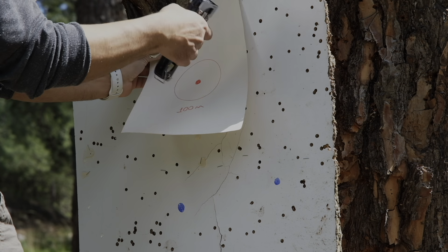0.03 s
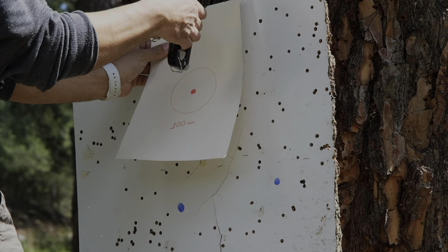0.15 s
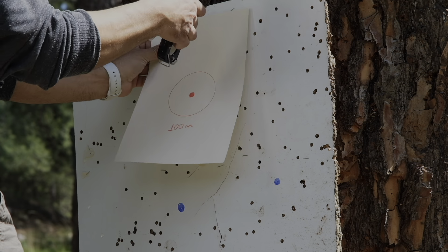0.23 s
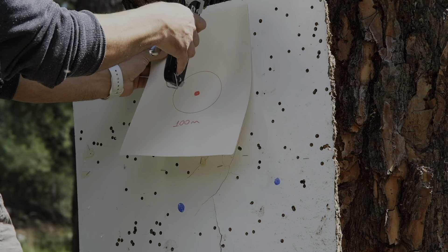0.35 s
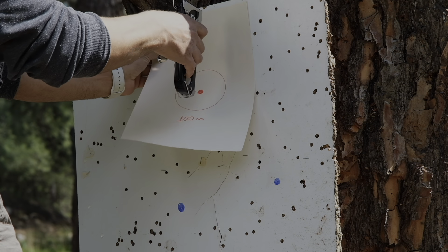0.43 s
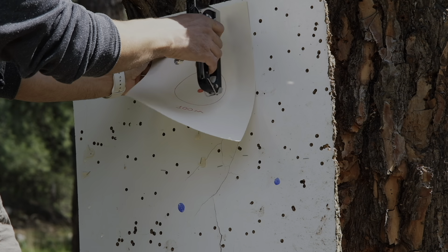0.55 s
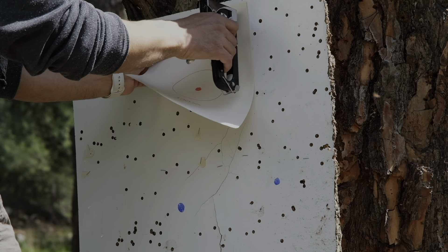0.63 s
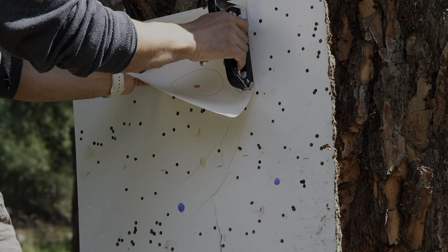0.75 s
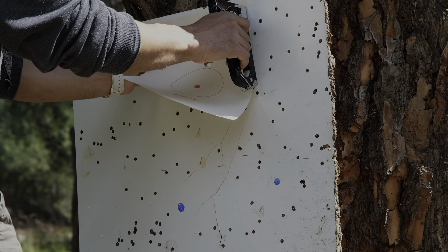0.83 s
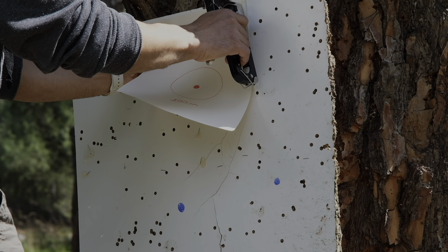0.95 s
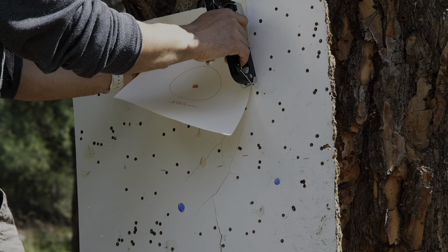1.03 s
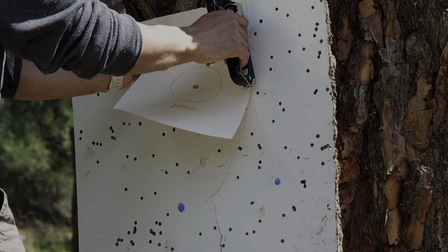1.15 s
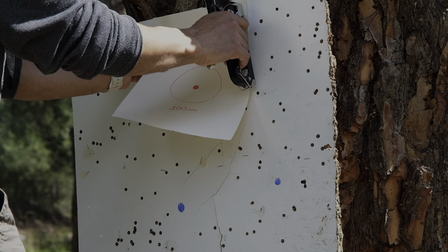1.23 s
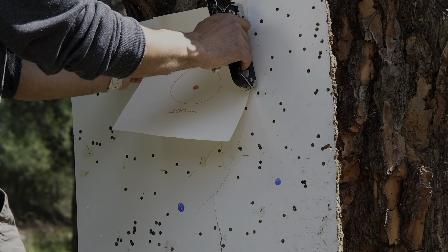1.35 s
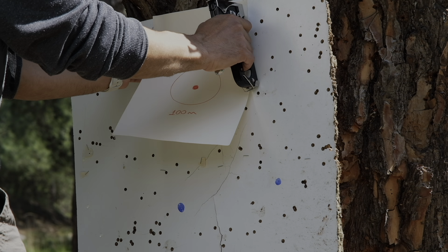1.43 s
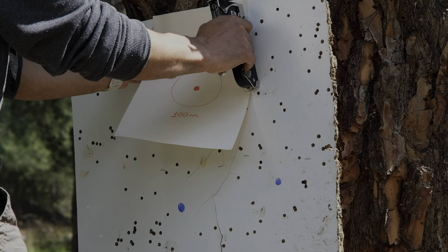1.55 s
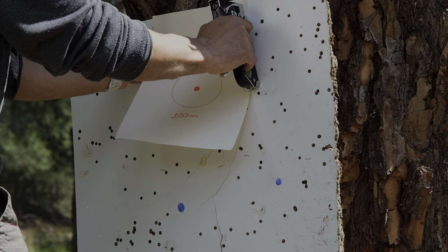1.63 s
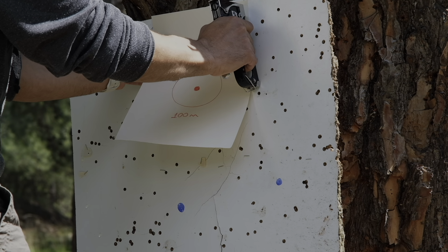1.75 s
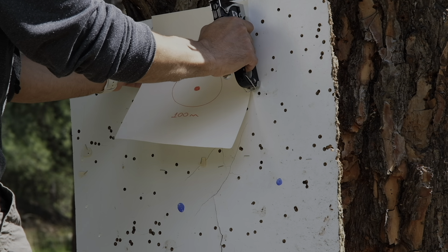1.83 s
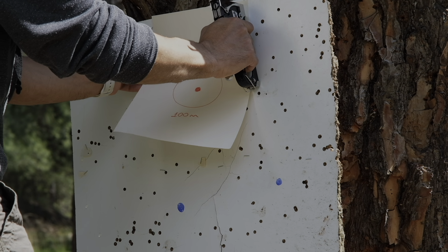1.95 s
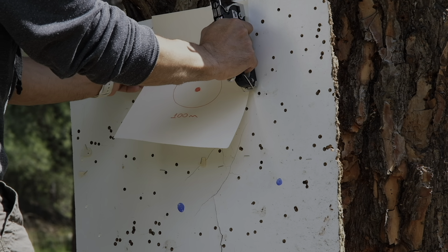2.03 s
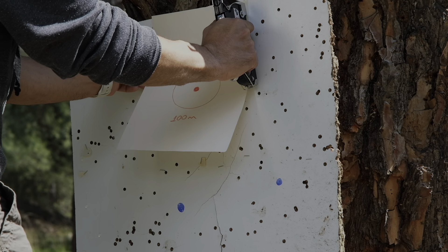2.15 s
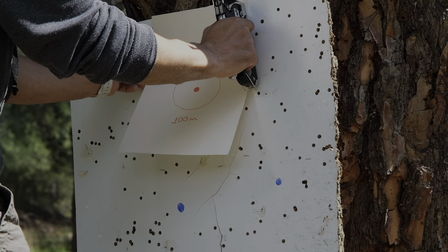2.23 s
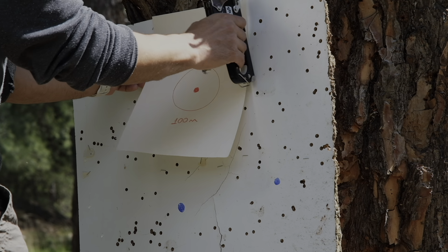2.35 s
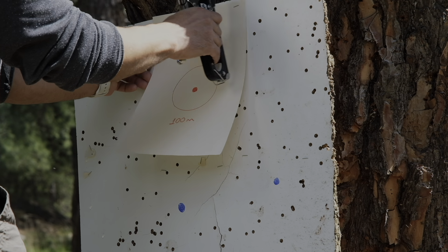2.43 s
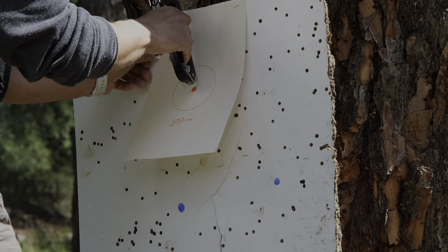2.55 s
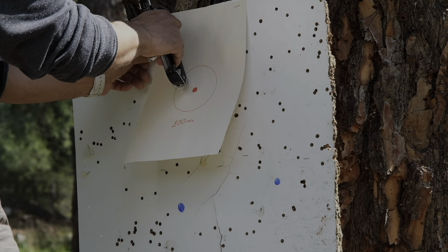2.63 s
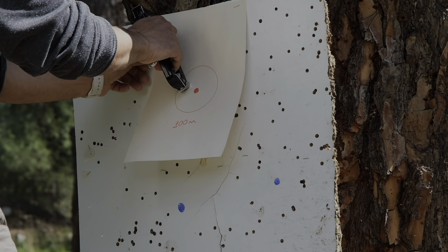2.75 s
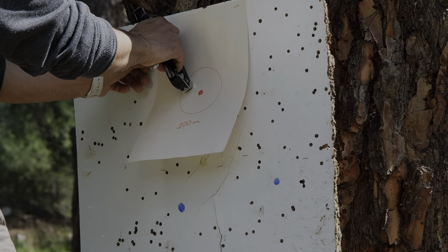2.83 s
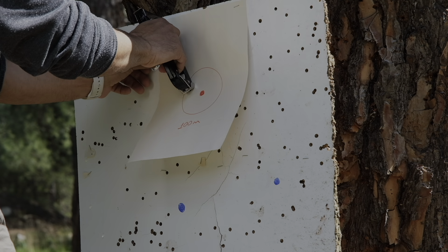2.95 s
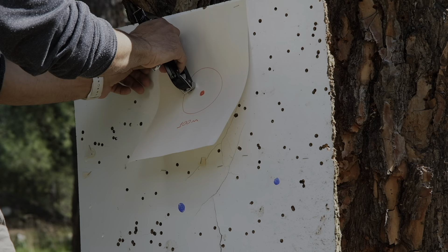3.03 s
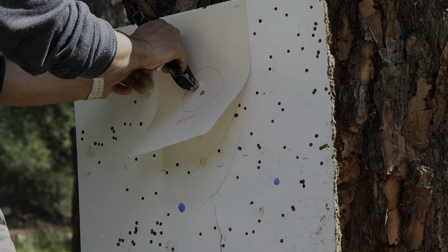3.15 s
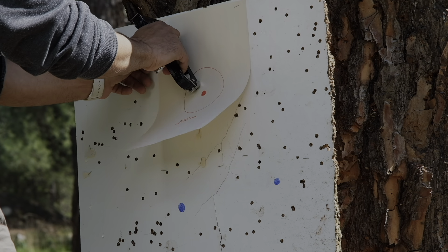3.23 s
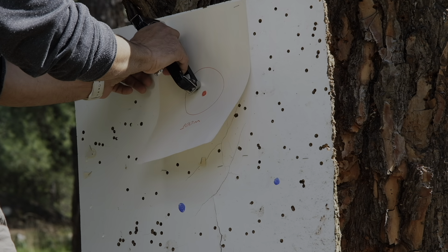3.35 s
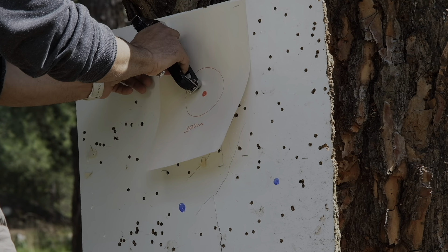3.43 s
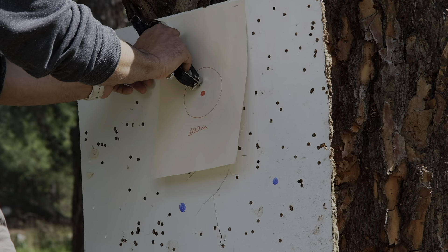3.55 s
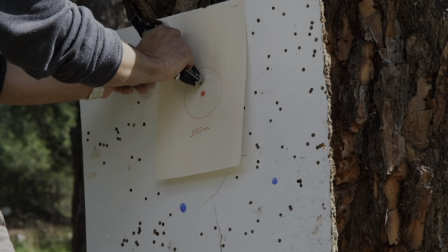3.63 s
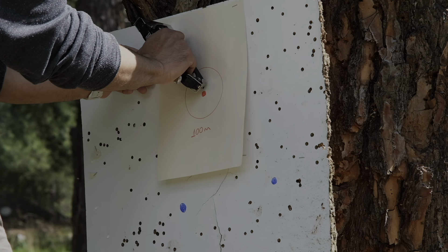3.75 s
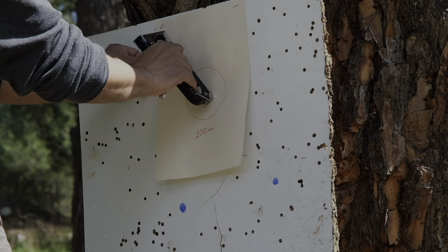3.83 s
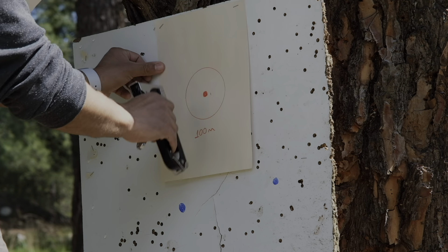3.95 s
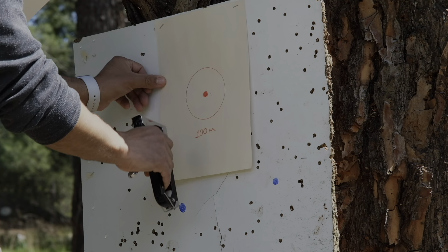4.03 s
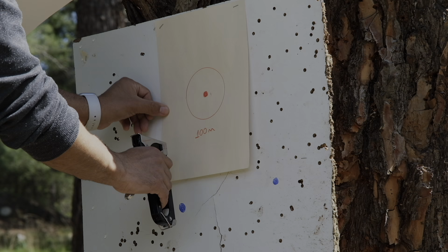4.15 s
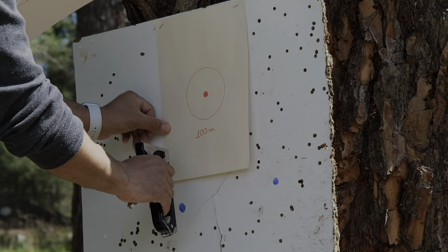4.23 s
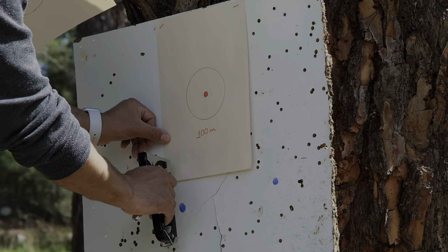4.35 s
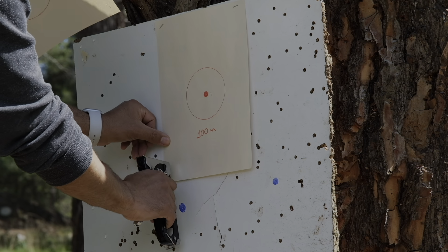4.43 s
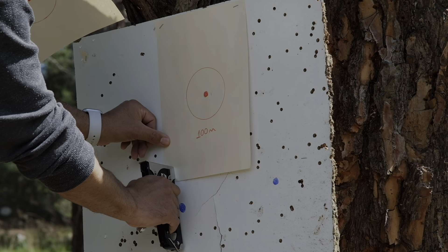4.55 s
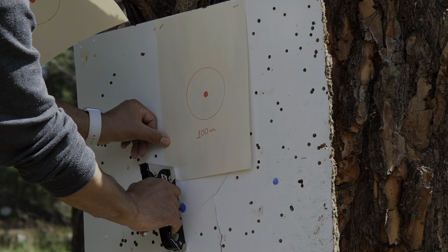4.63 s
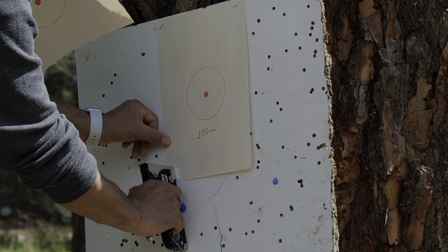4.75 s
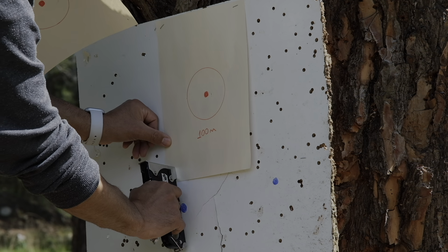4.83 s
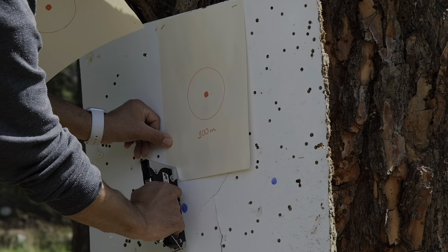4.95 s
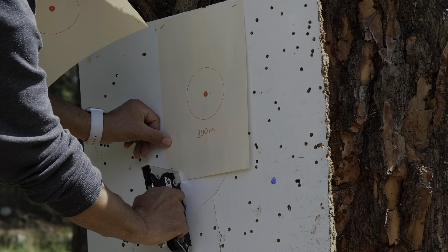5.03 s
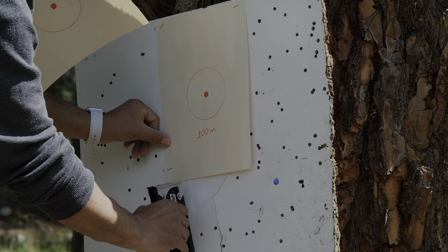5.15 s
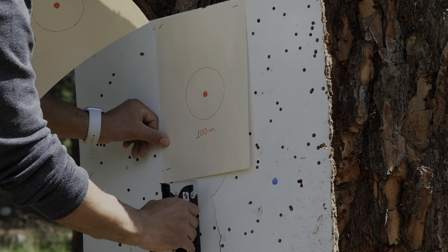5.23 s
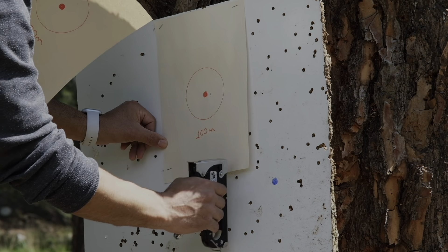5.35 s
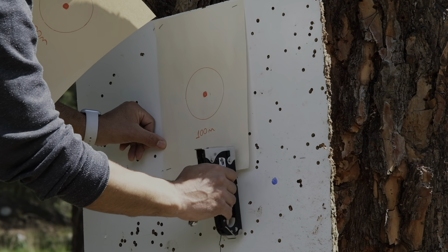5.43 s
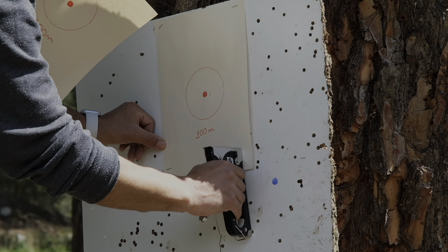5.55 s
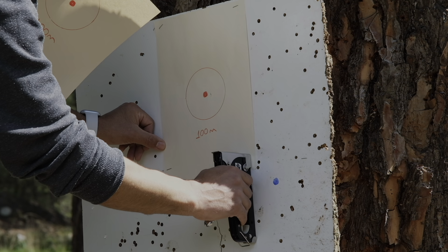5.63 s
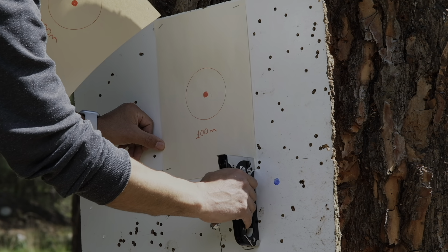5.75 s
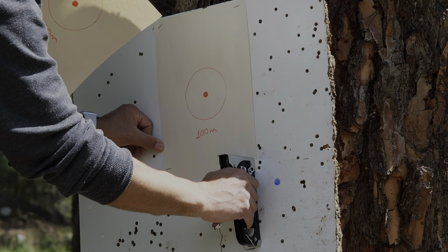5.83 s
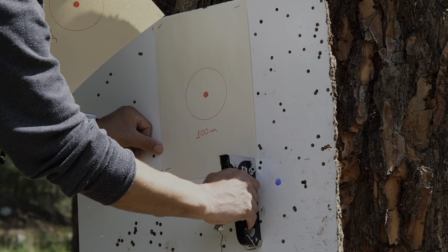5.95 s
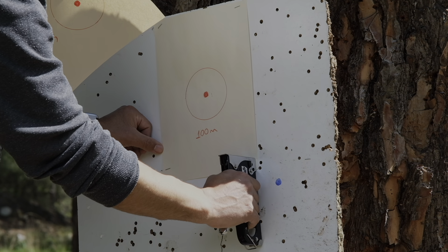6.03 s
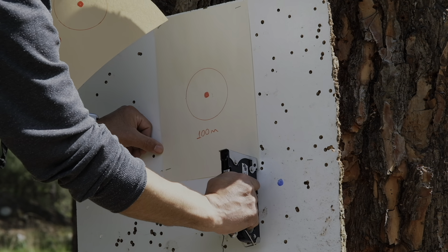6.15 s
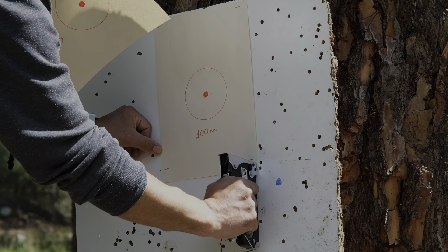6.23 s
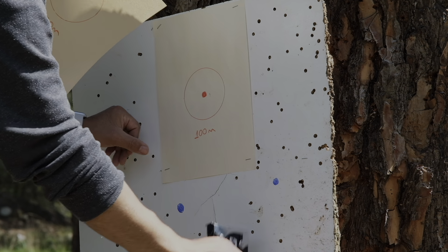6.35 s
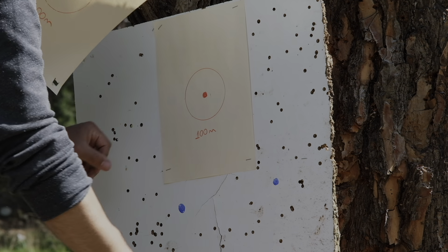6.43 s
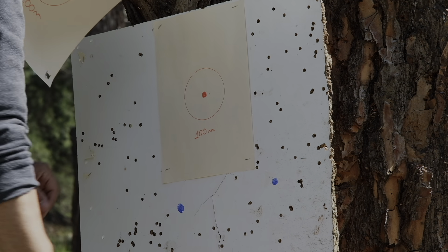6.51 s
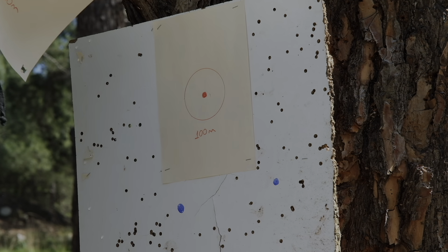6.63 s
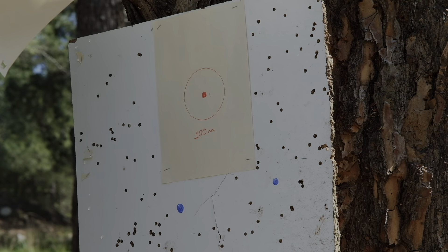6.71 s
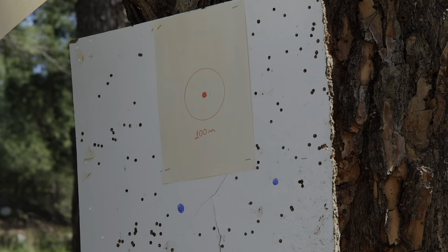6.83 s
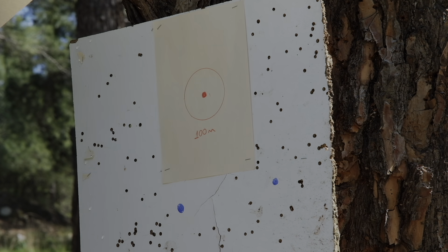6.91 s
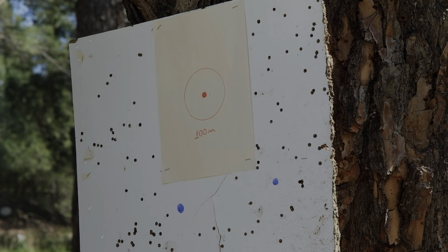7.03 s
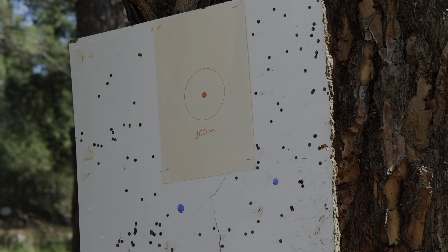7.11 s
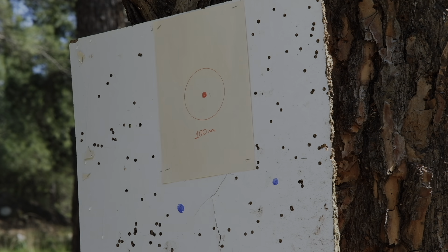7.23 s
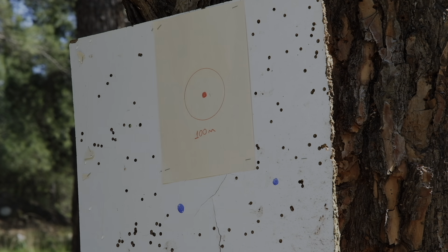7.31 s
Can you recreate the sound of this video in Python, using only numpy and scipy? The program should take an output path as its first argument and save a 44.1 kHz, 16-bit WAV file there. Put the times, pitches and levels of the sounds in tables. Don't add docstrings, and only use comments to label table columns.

```python
import sys
import numpy as np
from scipy import signal
from scipy.io import wavfile
from scipy.ndimage import uniform_filter1d

SR = 44100
rng = np.random.default_rng(int(sys.argv[2]) if len(sys.argv) > 2 else 0)


def bounce(signal):
    frames = np.transpose(np.atleast_2d(signal))
    limited = np.clip(frames, -1, 1)
    pcm = np.round(limited * 32767).astype(np.int16)
    wavfile.write(sys.argv[1], SR, pcm)


def rack_gain(trim_db):
    fader = np.asarray(trim_db, float)
    return 10 ** (fader / 20)


N = 325335

# start_s, board_db, board_pitch (factor), steel_db, top_db (re steel)
HANDLE = [
    (2.2886, -19, 1.28, -43, -30),
    (3.8472, -18.5, 1.04, -41, -21),
    (5.104, -18, 1.08, -37.5, -11),
]


def evened(x):
    return x / np.sqrt(np.mean(x ** 2) + 1e-20)


def peaked(x):
    return x / (abs(x).max() + 1e-20)


def read(points, hz):
    f, value = np.transpose(points)
    return np.interp(np.log(hz + 1), np.log(f + 1), value)


def follow(points):
    s, db = np.transpose(points)
    return rack_gain(np.interp(np.arange(N) / SR, s, db))


def add(mix, s, sound):
    part = mix[round(s * SR):][:len(sound)]
    part += sound[:len(part)]


def resonate(x, hz, width):
    pole = np.exp((2j * np.pi * hz - np.pi * width) / SR)
    return 2 * signal.lfilter([1 - abs(pole)], [1, -pole], x + 0j).real


def ring(modes, t, pitch, damping):
    out = 0
    for hz, db, t60 in modes:
        out = out + rack_gain(db - 60 * t * damping / t60) * np.sin(2 * np.pi * hz * pitch * t)
    return out


def hiss(colour, patchy_db, flicker_db=0.):
    frames, hz = N // 128 + 5, np.fft.rfftfreq(512, 1 / SR)
    a, b, patches = rng.standard_normal((frames, 257, 3)).T
    patches = uniform_filter1d(patches, size=6, axis=0)
    patches = evened(uniform_filter1d(patches, size=24, axis=1))
    flicker = evened(uniform_filter1d(rng.standard_normal(frames), size=3))
    level_db = read(colour, hz)[:, None]
    z = (a + 1j * b) * rack_gain(level_db + patchy_db * patches + flicker_db * flicker)
    return evened(signal.istft(z, nperseg=512, noverlap=384)[1][:N])


def bursts(rows, grain_db, taper):
    out = np.zeros(N)
    for s, length_s, db, hz, width in rows:
        noise, grain = rng.standard_normal((2, 12000))[:, :int(length_s * SR)]
        noise = noise * rack_gain(grain_db * evened(uniform_filter1d(grain, size=60)))
        tone = evened(resonate(resonate(noise, hz, width), hz, width))
        add(out, s, rack_gain(db) * tone * signal.windows.tukey(len(noise), taper))
    return out


def wash():
    # pitch_hz, density_db (per Hz)
    colour = [(30, -7), (55, 0), (85, 2), (180, -4), (330, -8.5), (620, -2), (950, -4.5), (1400, -8),
              (1900, -17.5), (2800, -24), (5000, -27.5), (9000, -32), (15300, -34), (16400, -47.5)]
    return rack_gain(-64) * hiss(colour, patchy_db=1.0)


def wind():
    # time_s, buffet_db
    gusts = [(0.0, -58), (0.04, -52.5), (0.24, -59.5), (0.29, -50), (0.39, -61), (0.68, -50.5), (1.42, -60),
             (1.6, -58), (1.68, -59), (1.72, -58.5), (2.77, -77), (4.5, -65), (7.21, -79.5), (7.38, -81)]
    low = signal.sosfilt(signal.butter(2, 24, fs=SR, output="sos"), rng.standard_normal(N))
    low = signal.sosfilt(signal.butter(1, 7, "high", fs=SR, output="sos"), low)
    return rack_gain(-1.5) * follow(gusts) * evened(low)


def leaves():
    # pitch_hz, density_db (per Hz)
    colour = [(4000, -20.5), (4800, -4), (5500, -4), (7000, -5), (9000, -10.5), (12000, -28.5)]
    # time_s, level_db
    stir = [(0, -88), (1.2, -91.5), (2.6, -82), (3.3, -86.5), (4.1, -82), (5.4, -84.5), (5.9, -91),
            (7.377, -88.5)]
    return follow(stir) * hiss(colour, patchy_db=3.0, flicker_db=2.5)


def trees(x):
    # pitch_hz, t60_s
    decay = [(200, 0.17), (800, 0.4), (3000, 0.22), (8000, 0.3), (15000, 0.11)]
    taps = np.zeros(SR // 2)
    at = np.arange(400, len(taps) - 20, 20)
    taps[at + rng.integers(0, 20, len(at))] = rng.choice([-1., 1.], len(at))
    hz, t, z = signal.stft(taps, SR, nperseg=256)
    z = z * rack_gain(-60 * t / read(decay, hz)[:, None])
    tail = signal.istft(z, SR, nperseg=256)[1]
    return signal.fftconvolve(x, tail / np.linalg.norm(tail))[:N]


def twig_ticks():
    # start_s, level_db, pitch_hz
    ticks = [(4.15, -72, 5200), (4.175, -85, 4970), (4.401, -79, 5500), (5.464, -67, 5200),
             (5.464, -66, 6900), (5.495, -76, 5200), (5.516, -71, 5600), (5.54, -73, 5140),
             (5.705, -65.5, 5070)]
    return bursts([(s, 0.006, db, hz, 740) for s, db, hz in ticks], grain_db=3.5, taper=0.8)


def rubbing():
    # start_s, length_s, level_db, centre_hz
    brushes = [(.13, 0.058, -65.5, 3100), (.74, 0.013, -69, 3530), (.99, .09, -72.5, 3250),
               (1.03, .05, -78, 8000), (1.43, 0.043, -72, 2860), (2.21, 0.046, -65.5, 2980),
               (2.79, .13, -69.5, 3200), (3.15, .082, -73, 3580), (3.72, .1, -66.5, 3650),
               (3.835, 0.059, -50, 3200), (5.05, 0.069, -63.5, 3490), (5.15, 0.045, -66.5, 4020),
               (5.59, .087, -68, 5900), (6.28, 0.091, -67.5, 3930), (6.35, 0.037, -62, 4360),
               (7.15, 0.11, -76, 5030), (7.31, 0.068, -73, 5000)]
    # start_s, length_s, level_db, centre_hz
    flutters = [(1.7, .26, -80, 4430), (3.44, 0.082, -80, 4700), (4.5, 0.15, -79, 5180),
                (5.21, .046, -72, 6440), (5.42, 0.17, -78, 5500), (5.68, 0.18, -80, 5330)]
    # start_s, length_s, level_db, centre_hz
    chatter = [(2.1, 0.027, -53.5, 450), (3.642, 0.043, -45, 198), (3.685, 0.14, -58, 244),
               (4.598, 0.019, -50, 159), (5.104, 0.0248, -40.5, 120), (5.108, 0.0384, -41, 202),
               (5.626, 0.026, -51.5, 109), (6.19, 0.094, -53.5, 90.3), (5.135, 0.07, -51, 344),
               (6.255, 0.041, -48.5, 300)]
    kinds = (brushes, 1), (flutters, .25), (chatter, 0.68)
    rubs = [(*row, spread * row[-1]) for rows, spread in kinds for row in rows]
    return rack_gain(-4.5) * bursts(rubs, grain_db=2.0, taper=0.57)


def loose_parts():
    # start_s, length_s, level_db, pitch_hz
    singing = [(2.144, .08, -69, 7500), (2.199, .068, -73, 3320), (2.099, .025, -56, 4750),
               (3.641, .02, -47.5, 3244), (4.955, .025, -62, 4700), (5.01, .04, -65, 7370),
               (6.144, .03, -78, 4300)]
    return rack_gain(-5) * bursts([(*row, 130) for row in singing], grain_db=1.04, taper=0.4)


def blows():
    # start_s, level_db, pitch (factor of the spot struck), thud_db (re blow)
    knocks = [(1.522, -43, 1.07, -11.5), (2.026, -47, 1.2, -26), (3.258, -45, 0.88, -12),
              (3.669, -39, 0.6, -3), (3.749, -41, 1.2, -8), (4.6, -38, 0.92, -25), (4.61, -55, 1.01, -5.5),
              (4.662, -41.5, 0.95, -12), (4.994, -42.5, 0.76, 2.5), (5.007, -51, 1, -21),
              (5.014, -34.5, 0.81, -8), (5.626, -38.5, 0.9, -10), (5.703, -45, 0.7, -10),
              (6.1405, -41, 1.01, -30), (6.227, -25, 1.08, -15), (6.247, -29, 0.92, -27),
              (6.267, -55.5, 0.57, -6)]
    # start_s, level_db, thud_db (re blow), damping (factor), rebound_s (wait)
    drives = [
        (2.086, -18.5, -26, .83, 0.0037),
        (3.635, -20, -19.5, .87, 0.0041),
        (4.944, -12, -24.5, 1.95, .0015),
        (6.18, -13.5, -18.5, .96, 0.005),
    ]
    rows = [(*row, 1.3) for row in knocks]
    rows += [(s, db, pitch, -19.5, 2.1) for s, db, pitch, _, _ in HANDLE]
    for s, db, thud_db, damping, rebound_s in drives:
        rows.append((s, db, 1.05, thud_db, damping))
        rows.append((s + rebound_s, db - 7, 1.05, -31.5, 1.13))
    return rows


def board():
    # pitch_hz, level_db, t60_s
    panel = [(347, -18, 0.0083), (450, 1.5, 0.055), (530, 4, 0.025), (677, 4.5, 0.037), (740, -9.5, 0.0073),
             (1000, -13.5, 0.035), (1440, -20, 0.007), (2154, -17.5, .018), (3200, -23.5, 0.021)]
    # pitch_hz, width_hz, level_db
    thud = [(136, 84, -8.5), (232, 150, 8), (420, 160, -10)]
    out, t = np.zeros(N), np.arange(7000) / SR
    push = np.hanning(16)
    for s, db, pitch, thud_db, damping in blows():
        jolts = rng.standard_normal(len(t)) * rack_gain(-60 * t / .11)
        shudder = sum(rack_gain(m_db) * peaked(resonate(jolts, hz * pitch, w)) for hz, w, m_db in thud)
        blow = peaked(ring(panel, t, pitch, max(damping, .3)))
        blow = blow + rack_gain(thud_db + 4) * peaked(shudder)
        add(out, s + .001, rack_gain(db) * np.convolve(blow, push / push.sum()))
    return signal.sosfilt(signal.butter(3, 190, "high", fs=SR, output="sos"), out)


def spring():
    # start_s, partial_1_db, partial_2_db, partial_3_db, stop_s (wait for the handle)
    rings = [
        (2.089, -41, -30, -50, .033),
        (3.638, -41.5, -34.5, -45, 0.035),
        (4.946, -21, -18, -44, 0.037),
        (6.183, -18.5, -33, -38, 0.027),
    ]
    # pitch_hz, t60_s
    partials = [(680, .07), (1343, .14), (2015, .1), (2650, .12)]
    out, t = np.zeros(N), np.arange(5000) / SR
    for s, *partial_db, stop_s in rings:
        levels_db = [*partial_db, -44]
        modes = [(hz, db, t60) for (hz, t60), db in zip(partials, levels_db)]
        swell = 1 - np.exp(-t / .003)
        stop = .07 + .93 / (1 + np.exp((t - stop_s) / .004))
        add(out, s, ring(modes, t, pitch=1, damping=1.0) * swell * stop)
    return out


def steel(rows, rise_s, t60, blow_db, near_db, far_db):
    # pitch_hz, width_hz, level_db
    parts = [
        [(1020, 370, -2.5), (1435, 410, -4), (1923, 340, -4.5)],
        [(2670, 300, -10), (3200, 760, 5), (3950, 240, -0.5), (4700, 610, -9)],
        [(7080, 570, -6), (7590, 170, -5), (9020, 1800, 6), (10030, 960, -7.5)],
        [(12960, 2700, -1.5), (13200, 930, -13), (15400, 1200, -2.5)],
    ]
    # low_edge_hz, high_edge_hz, near_t60_s, far_t60_s
    returns = [
        (900, 1700, .05, 0.38),
        (2600, 6400, 0.039, 0.23),
        (5500, 9900, 0.028, .2),
        (11000, 14000, 0.034, .09),
    ]
    out, t = np.zeros(N), np.arange(10000) / SR
    bands = [signal.butter(2, (lo, hi), "band", fs=SR, output="sos") for lo, hi, _, _ in returns]
    rise = np.minimum(t / rise_s, 1) ** 2.5
    late = np.maximum(t - rise_s, 0)
    for s, db, low_db, high_db, top_db, struck_hz in rows:
        contacts, size, *scatter = rng.standard_normal((6, len(t)))
        swarm = contacts * rack_gain(1.7 * size) * rise * rack_gain(-60 * late / t60)
        swarm[int(rise_s * SR)] = -rack_gain(blow_db)
        rattle = rack_gain(1.6 * evened(uniform_filter1d(size, size=150)))
        for k, part_db in enumerate((low_db, 0, high_db, top_db)):
            modes = parts[k] + [(struck_hz, 600, 8)] * (k == 1)
            body = sum(rack_gain(m_db) * peaked(resonate(swarm, hz, w)) for hz, w, m_db in modes)
            body = signal.sosfilt(bands[k], body + 1.2 * peaked(swarm))
            echo = sum(rack_gain(m_db) * resonate(scatter[k], hz, 1.2 * w) for hz, w, m_db in modes)
            tail = evened(signal.sosfilt(bands[k], scatter[k] + rack_gain(3) * echo))
            near_s, far_s = returns[k][2:]
            decay = rack_gain(near_db - 60 * late / near_s) + rack_gain(far_db - 60 * late / far_s)
            tail = tail * rise * rattle * decay
            add(out, s + .0009 - rise_s, rack_gain(db + part_db) * (peaked(body) + tail))
    return out


def clicks():
    # start_s, level_db, high_db and top_db (re click), struck_hz
    latches = [(2.0263, -26, -9, -23.5, 3110), (2.3902, -51, -2, -10, 4040), (2.4074, -34, 3.5, -13, 2900),
               (3.5847, -33, -3, -3.5, 3220), (3.8747, -31.5, -2, -13, 4700), (4.881, -32, -6, -21.5, 4200),
               (5.187, -32.5, 0.5, -14.5, 4730), (6.1415, -30.5, -7.5, -19.5, 4130),
               (6.3849, -31.5, -1.5, -11, 4400), (6.412, -47, -5, -12.5, 2900)]
    # start_s, level_db, brightness_db, struck_hz
    snaps = [(0.1428, -52.5, -10, 3200), (0.163, -59, -16, 3240), (.552, -56, 0.5, 2700),
             (.7546, -61, -6, 3180), (1.4444, -66, -16, 2900), (1.853, -64, 4.5, 3370),
             (2.6135, -60.5, 6.5, 3070), (2.7063, -67, -4, 3080), (3.5327, -58, -14, 4420),
             (4.3171, -62, -2.5, 2594), (4.8417, -60, -9, 3560), (5.0067, -53, -12, 3610),
             (5.3482, -62.5, 5, 3040), (5.466, -74, -3, 5210), (5.5174, -82, -3.5, 5110),
             (5.6254, -69, -7, 2610), (5.7077, -75, -14, 5080), (6.1147, -50, -13, 4040),
             (6.463, -62, -12, 4010), (6.4792, -57, 3, 4620), (6.557, -62.5, 4.5, 2710),
             (6.6808, -51, -11, 2617), (7.338, -62.5, 1, 4074)]
    rows = [(s, db, -8, high_db, top_db, hz) for s, db, high_db, top_db, hz in latches]
    rows += [(s + .0004, db, 7.5, -6.5, top_db, 3100) for s, _, _, db, top_db in HANDLE]
    for s, db, bright_db, hz in snaps:
        low_db = -0.5 - 10 * np.log2(hz / 3000)
        top_db = -16 + 0.7 * bright_db
        rows.append((s, db, low_db, bright_db, top_db, hz))
    return steel(rows, .0012, t60=0.015, blow_db=9.0, near_db=-24, far_db=-44.0)


def slams():
    # start_s, crack_db, low_db and top_db (re crack), struck_hz
    slam_rows = [
        (2.0866, -8.5, -6, -11, 3326),
        (3.6345, -10.5, -5.5, -10.5, 4200),
        (4.9439, -10.5, -4.5, -13.5, 3720),
        (6.182, -11, -7, -6, 3700),
    ]
    rows = [(s, db, low_db, -0.37, top_db, hz) for s, db, low_db, top_db, hz in slam_rows]
    metal = steel(rows, .0024, t60=0.015, blow_db=15, near_db=-17.5, far_db=-39.5)
    return metal - 0.55 * resonate(metal, 2450, 400)


def scene():
    metal = slams() + clicks()
    cancelled = .75 * resonate(metal, 5650, 980)
    metal = metal - cancelled + .5 * resonate(metal, 14000, 5100)
    wood = board()
    near = metal + spring() + wood + rack_gain(-27.0) * trees(wood)
    small = rubbing() + loose_parts() + twig_ticks()
    return (near + small + wash() + wind() + leaves())[None]


def top_cut(x):
    return signal.sosfilt(signal.butter(12, 16880, fs=SR, output="sos"), x)


def record(dry):
    overloaded = 0.79 * np.tanh(dry / 0.83)
    limited = signal.oaconvolve(overloaded, signal.firwin(101, 16500, fs=SR)[None], "same")
    return top_cut(limited)


dry = scene()
out = record(dry)
bounce(out)
```